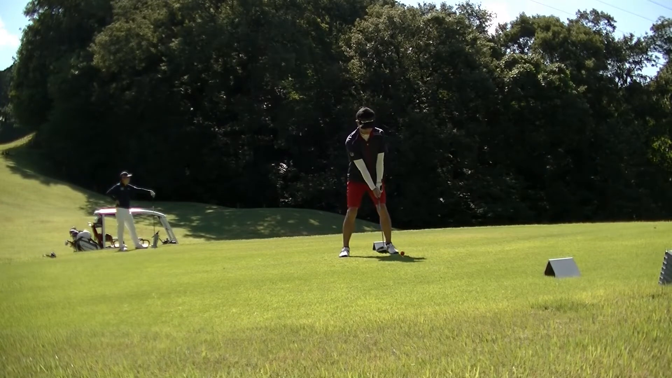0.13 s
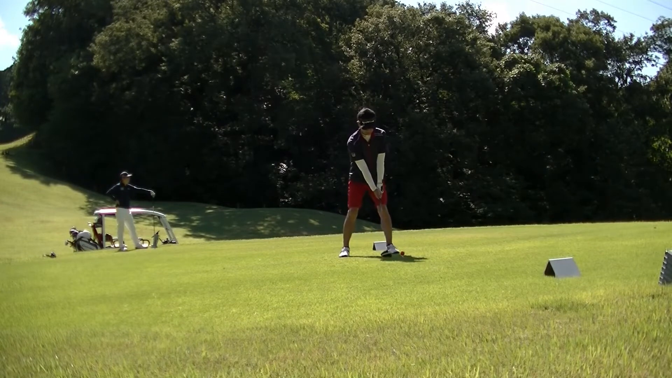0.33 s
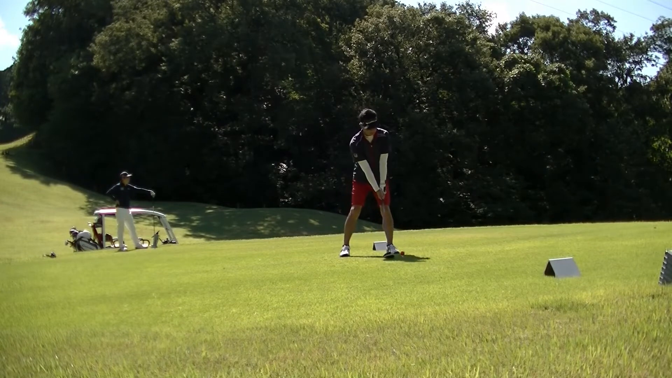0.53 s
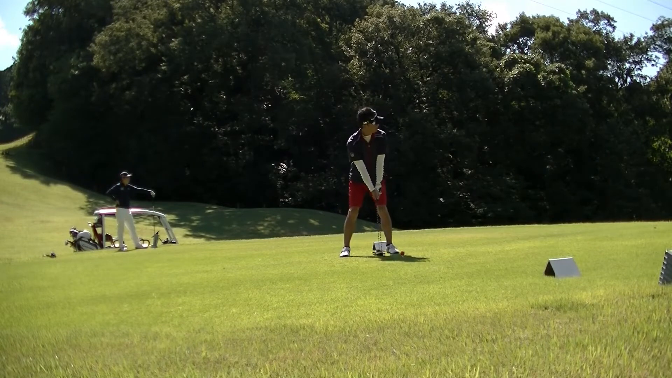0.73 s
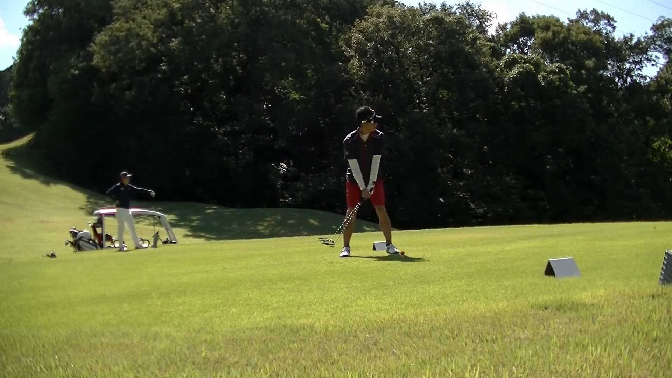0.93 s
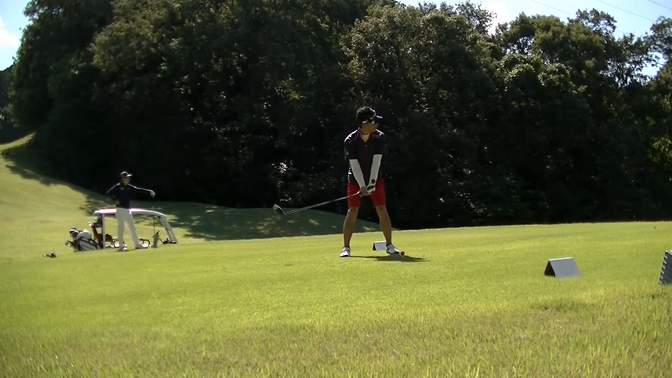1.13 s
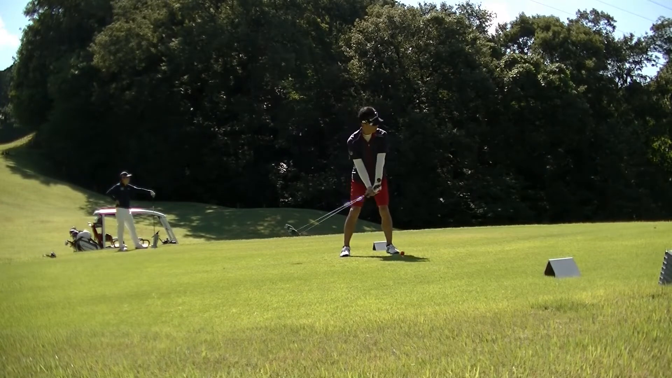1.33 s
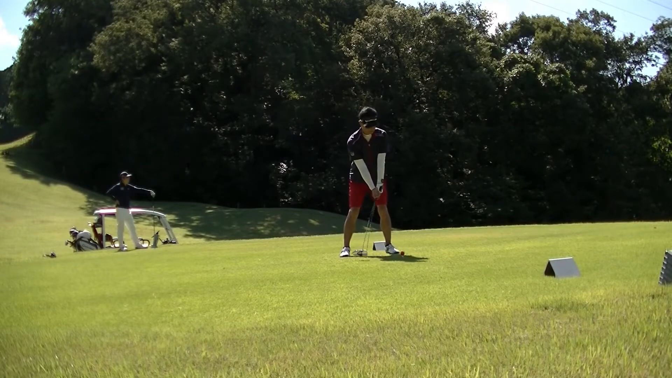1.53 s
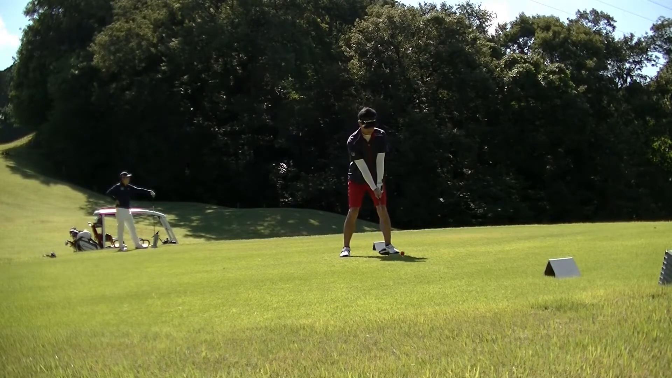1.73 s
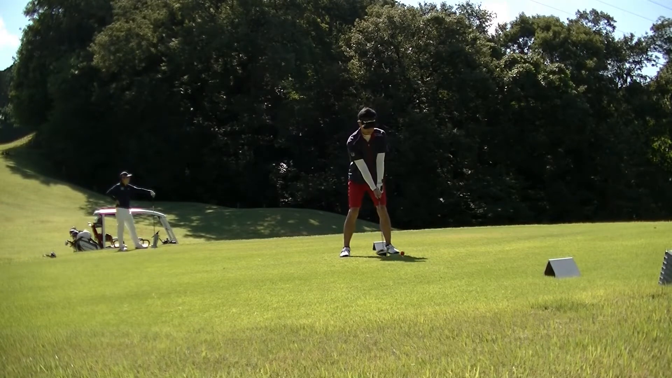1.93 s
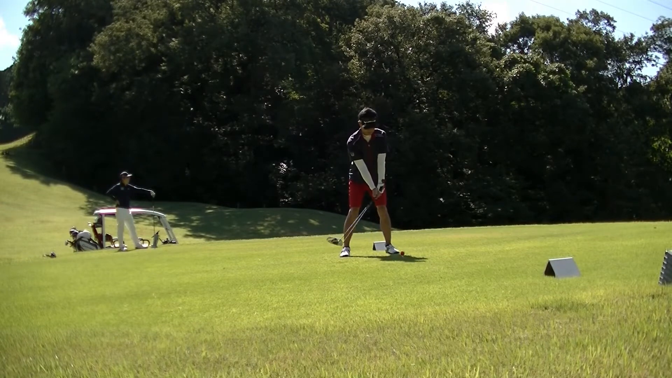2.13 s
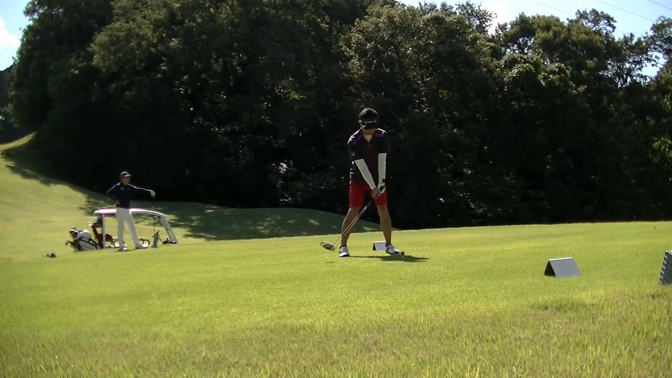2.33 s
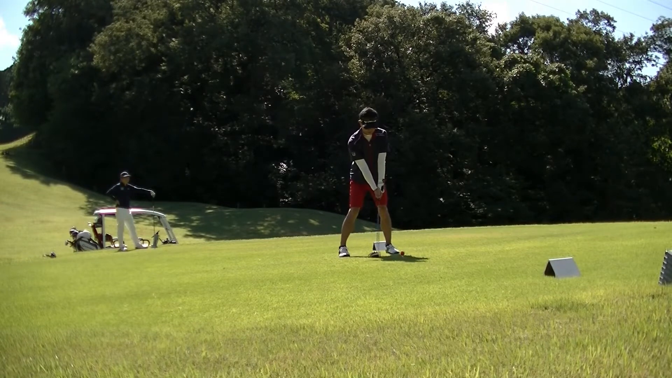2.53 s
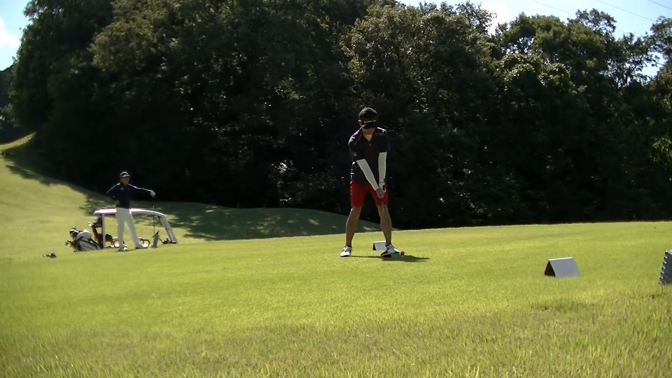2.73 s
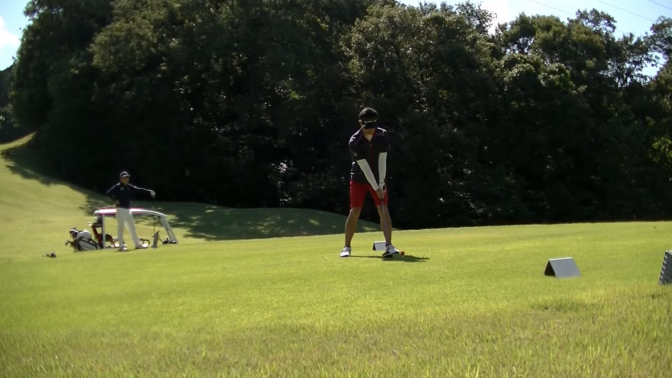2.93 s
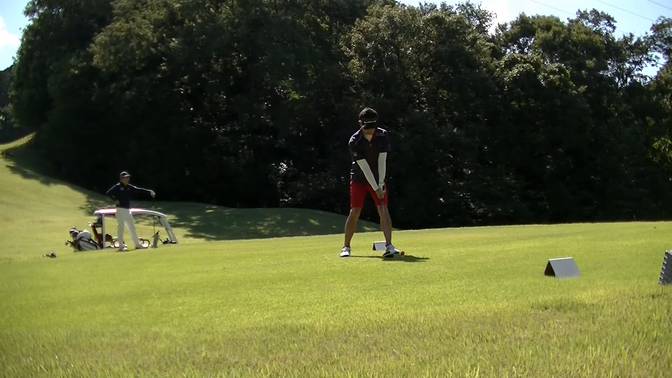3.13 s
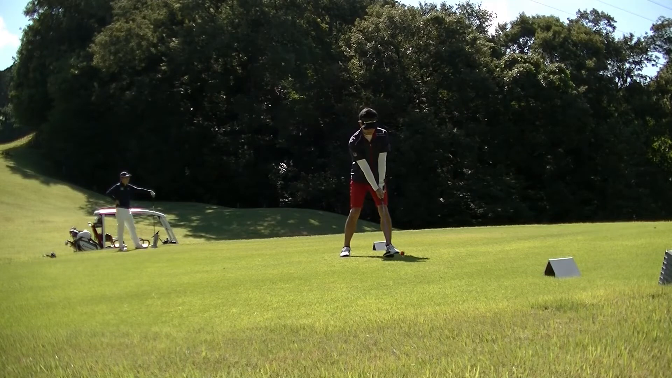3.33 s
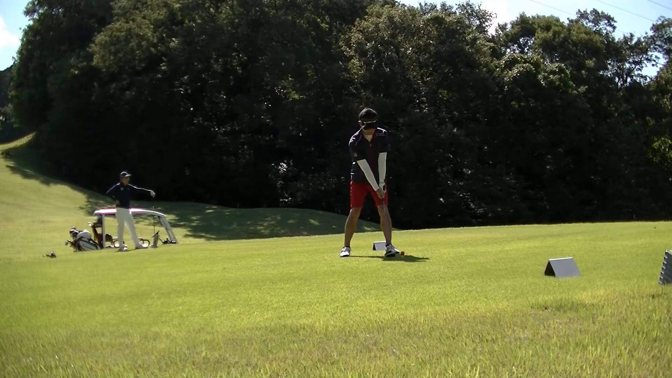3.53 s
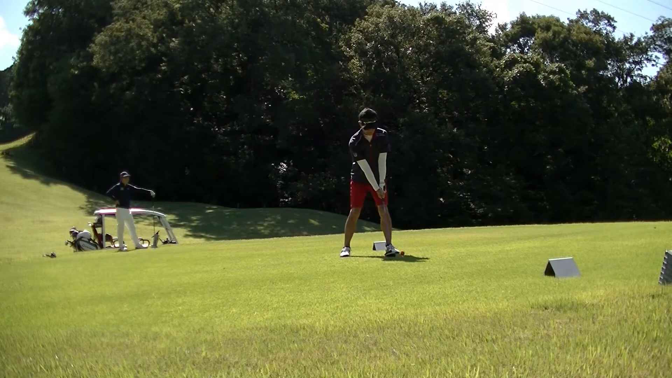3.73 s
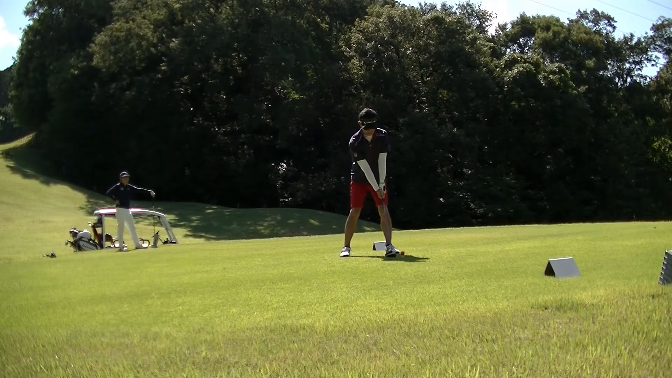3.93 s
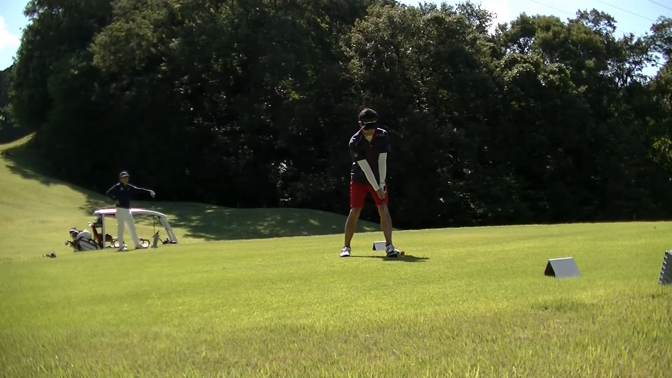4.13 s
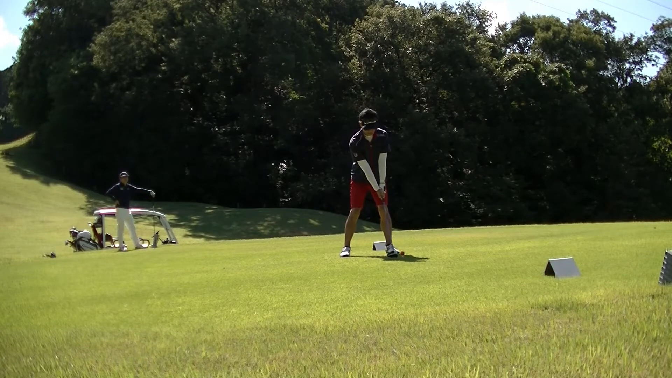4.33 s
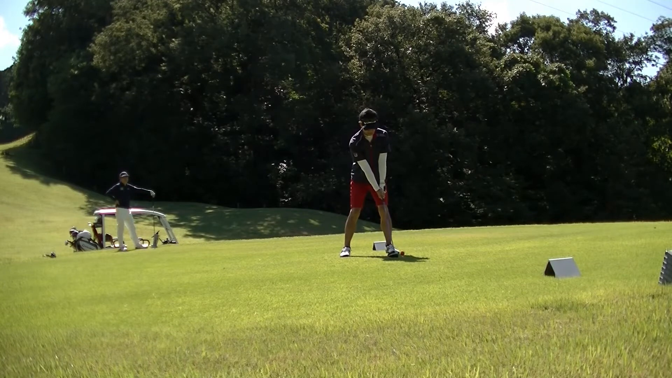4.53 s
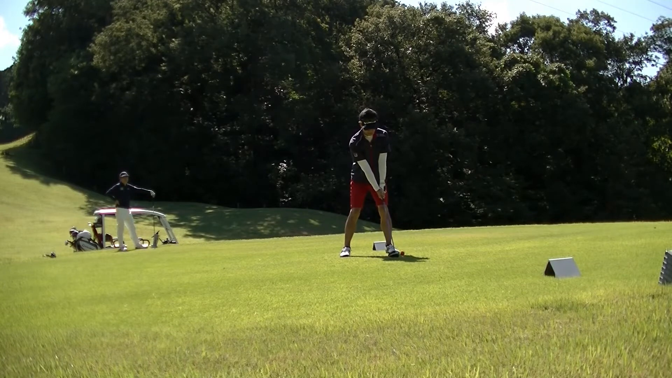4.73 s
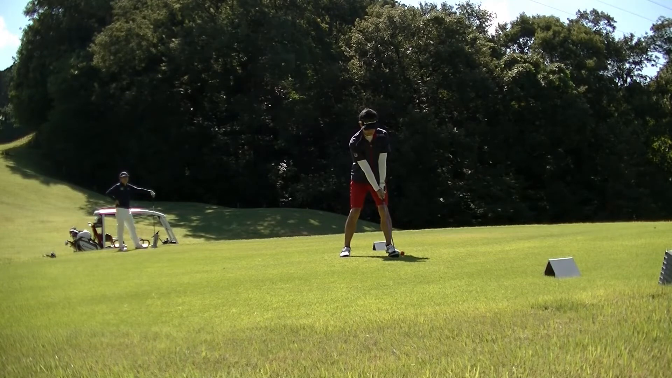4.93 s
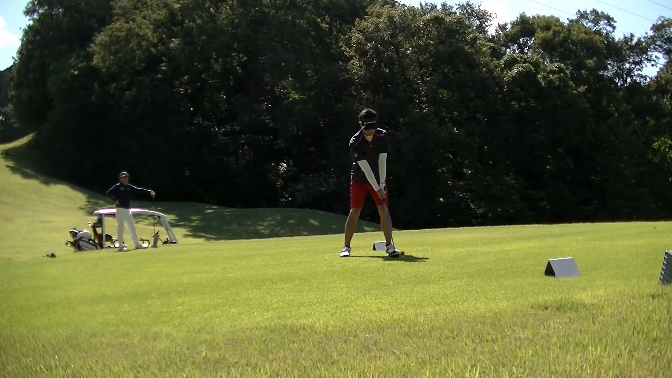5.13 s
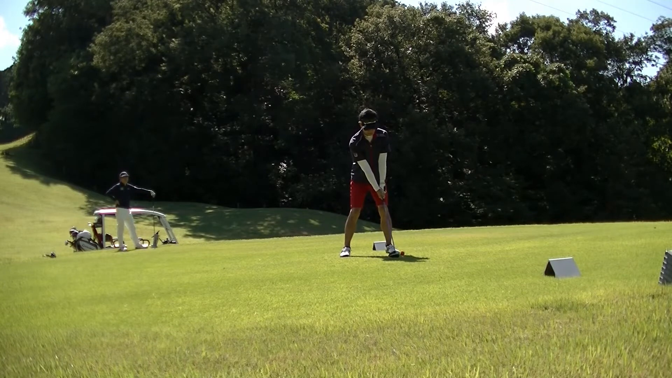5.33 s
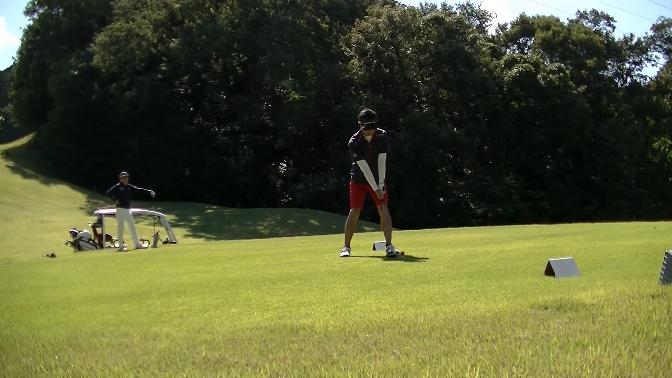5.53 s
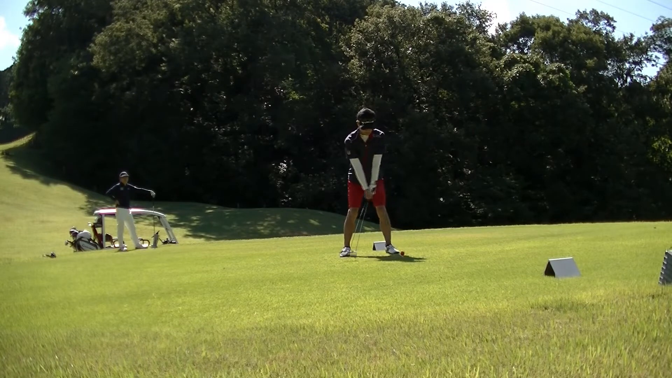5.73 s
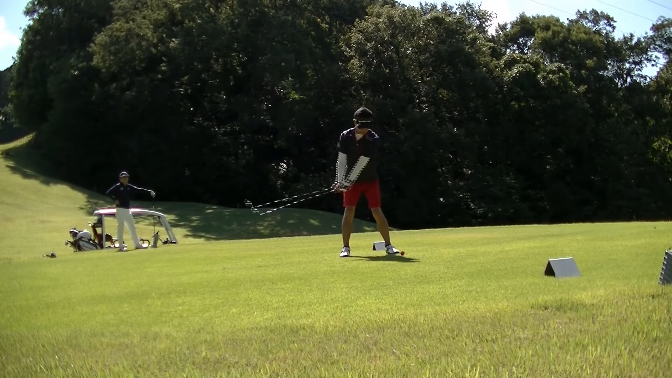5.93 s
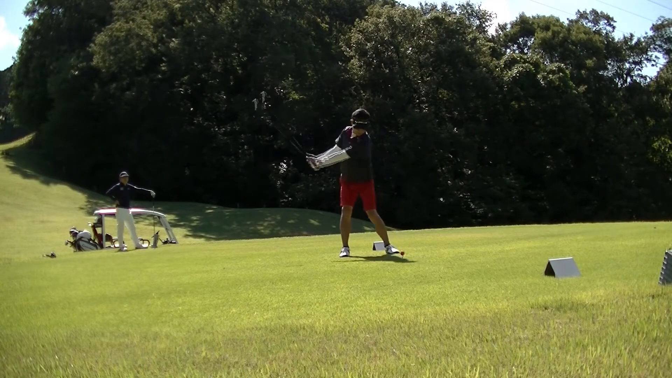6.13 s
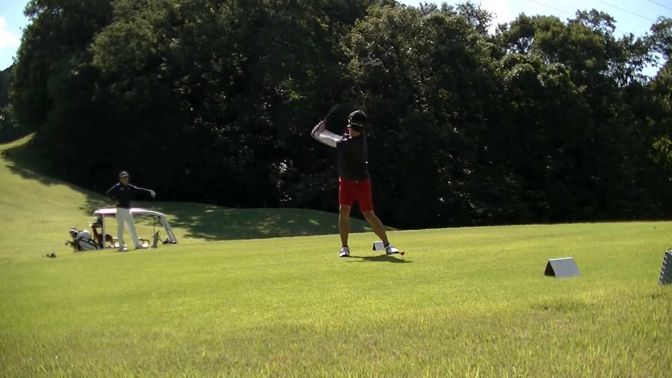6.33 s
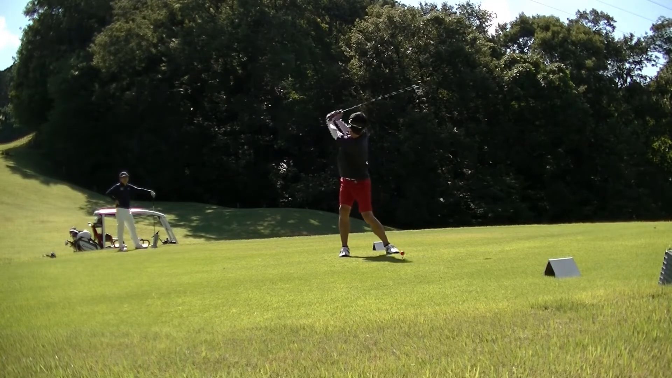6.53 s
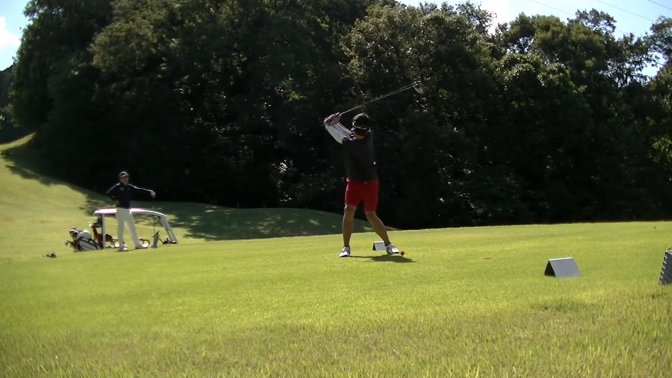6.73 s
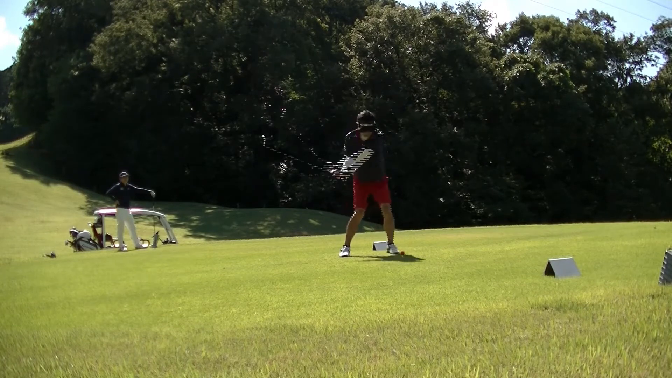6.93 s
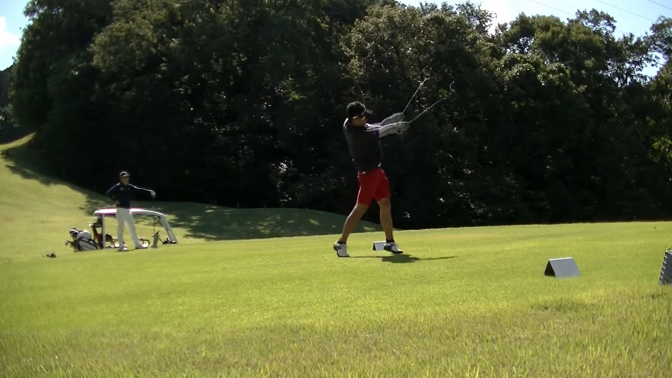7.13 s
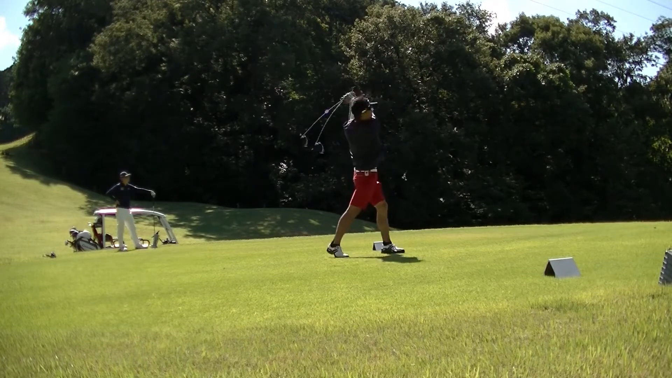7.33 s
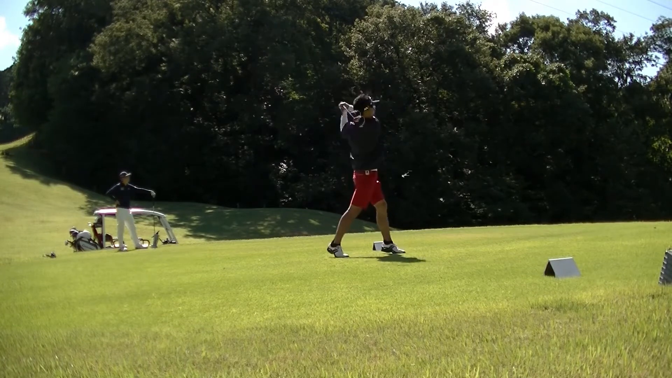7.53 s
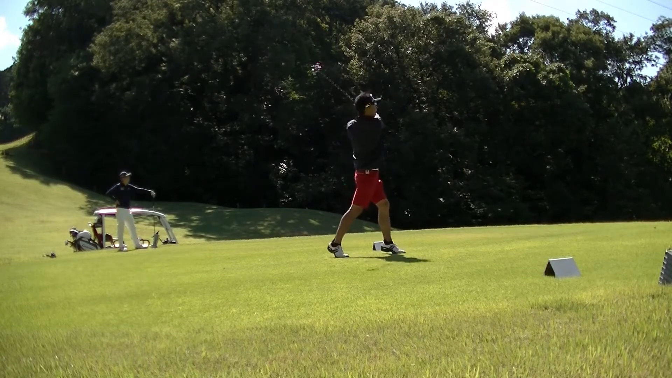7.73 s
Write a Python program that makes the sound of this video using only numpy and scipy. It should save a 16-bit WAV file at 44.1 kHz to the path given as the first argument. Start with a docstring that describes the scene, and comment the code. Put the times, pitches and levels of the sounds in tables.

```python
"""Golf drive at the edge of a wood

Air and a far insect chorus are coloured noise, cicadas noise-rung resonances; insects, birds and hoots are
noise bursts or gliding sines, plops decaying sines. Breeze on two microphone ports is low noise with single
eddy pulses. The shaft swishes as a speed-driven tone with hiss; the blow is a noise crack with decaying head
modes, followed by close copies, as off the ground, then thrown back by the trees as copies and a blurred wash."""
import sys
import numpy as np
from scipy import signal
from scipy.fft import rfft, irfft
from scipy.io import wavfile

SR = 44100
rng = np.random.default_rng(int(sys.argv[2]) if len(sys.argv) > 2 else 0)


def wrap_up_sound(samples):
    """Save the sound to the file named by the first command line argument, as 16-bit audio."""
    columns = np.atleast_2d(samples).T
    # keep every value between -1 and 1, then stretch to whole-number steps
    tamed = np.clip(columns, -1, 1)
    steps = np.round(tamed * 32767).astype(np.int16)
    wavfile.write(sys.argv[1], SR, steps)


N = 347592
TIME = np.arange(N) / SR
STRIKE_S = 7.0861


def from_db(db):
    """Amplitude gain of a level in dB."""
    return 10 ** (np.asarray(db, float) / 20)


def rms_one(x):
    """Scales to unit power over all channels."""
    return x / np.sqrt(np.mean(x ** 2) + 1e-20)


def in_time(rows):
    """Interpolates the columns of a (t/s, ...) table at every sample."""
    s, *columns = np.transpose(rows)
    return [np.interp(TIME, s, column) for column in columns]


def at_hz(points, hz):
    """Reads a (f/Hz, value) table on a log frequency axis."""
    table_hz, values = np.array(points).T
    return np.interp(np.log(np.maximum(hz, 1)), np.log(table_hz), values)


def colour(x, points):
    """Filters by a (f/Hz, level/dB) spectrum."""
    n = x.shape[-1]
    hz = np.arange(n // 2 + 1) * SR / n
    return irfft(rfft(x) * from_db(at_hz(points, hz)), n)


def stereo_noise():
    """White noise whose left-right correlation varies with frequency, by mid-side mixing."""
    # diffuse field at the two ports: f/Hz, correlation
    likeness = [(60, 0.87), (400, 0.34), (700, 0.37), (2400, 0.65), (4400, 0.89), (15000, 1)]
    mid, side = rfft(rng.standard_normal((2, N)))
    alike = np.clip(at_hz(likeness, np.arange(len(mid)) * SR / N), -1, 1)
    return irfft(np.sqrt(1 + alike) * mid + np.sqrt(1 - alike) * side * [[1], [-1]], N)


def drift(rate_hz):
    """Slow random curve of unit RMS: noise through two equal poles at rate_hz."""
    step = 40  # samples per slow point
    r = np.exp(-2 * np.pi * rate_hz * step / SR)
    noise = rng.standard_normal(N // step + 2002)
    slow = signal.lfilter([1], [1, -2 * r, r * r], noise)[2000:]  # settled part
    return np.interp(np.arange(N) / step, np.arange(len(slow)), rms_one(slow))


def resonate(x, hz, width_hz):
    """Two-pole resonance, about unit gain at its peak."""
    r = np.exp(-np.pi * width_hz / SR)
    zeros = np.array([1, 0, -1]) * (1 - r * r) / 2
    return signal.lfilter(zeros, [1, -2 * r * np.cos(2 * np.pi * hz / SR), r * r], x)


def resonate_twice(x, hz, width_hz):
    """Two equal resonances in series, for steeper skirts."""
    return resonate(resonate(x, hz, width_hz), hz, width_hz)


def band(x, low_hz, high_hz):
    """Butterworth band-pass."""
    return signal.sosfilt(signal.butter(2, [low_hz, high_hz], "band", fs=SR, output="sos"), x)


def glide(from_hz, to_hz, length_s):
    """Hann-shaped sine sliding linearly in pitch."""
    n = round(length_s * SR)
    phase = 2 * np.pi * np.cumsum(np.linspace(from_hz, to_hz, n)) / SR
    return np.hanning(n) * np.sin(phase)


def add(out, s, sound, pan_db=0, lag_s=0):
    """Adds a sound at s: left raised by pan_db / 2, right lowered by 0.875 pan_db and late by lag_s."""
    for side, shift_s, weight in ((0, 0, 1), (1, lag_s, -1.75)):
        i = max(round((s + shift_s) * SR), 0)
        out[side, i:i + len(sound)] += (sound * from_db(weight * pan_db / 2))[:N - i]


def air():
    """Far rustle and hiss: steady coloured noise."""
    # spectrum: f/Hz, relative density/dB per Hz
    spectrum = [(18, -43), (30, -19), (86, -5), (170, -2.5), (461, -2.5), (684, -3), (1100, -6), (1960, -9),
                (3770, -12), (4420, -4), (5900, -3.5), (6720, -13.5), (7270, -13), (14400, -25.5),
                (16000, -25)]
    return from_db(-57.5) * rms_one(colour(stereo_noise(), spectrum))


def far_chorus():
    """Far insect chorus: a soft band of noise that swells and fades."""
    # chorus: t/s, level/dB before the wander
    murmur = [(0.0, -66), (2.2, -64.5), (3.6, -70), (5.8, -70), (6.9, -65), (7.88, -75)]
    level_db = in_time(murmur)[0] + 2.0 * drift(4.4)
    return from_db(level_db) * rms_one(band(stereo_noise(), 1300, 3400))


def cicadas():
    """Clicks too dense to tell apart ring each body; every group throbs and swells on its own."""
    # body resonances: f/Hz, width/Hz, relative level/dB
    bodies = [(4270, 400, -1), (4550, 348, -1), (4866, 240, -2.5), (5187, 150, -3.5), (5455, 140, -2.5),
              (5797, 240, -2.5), (6026, 204, -3), (6290, 78, -5.5), (7230, 770, -10.5), (8320, 690, -14)]
    # whole chorus: t/s, level/dB
    chorus = [(0.0, -56.5), (0.6, -58), (1.5, -56.5), (5.3, -57.5), (7.88, -57)]
    # nearer cicadas swelling out of the chorus: start/s, length/s, f/Hz, level/dB
    solos = [(1.0, 0.32, 4660, -60.5), (3.2, 0.75, 5410, -62.5), (4.6, 0.5, 4950, -64),
             (5.398, 0.63, 5570, -66)]
    out = 0
    for hz, width_hz, db in bodies:
        throb = 1 + .33 * np.sin(2 * np.pi * 141 * TIME + 1.5 * drift(2))
        rings = resonate_twice(stereo_noise() * throb, hz, width_hz)
        out = out + from_db(db + 1.5 * drift(2) + 1.2 * drift(12)) * rms_one(rings)
    out = from_db(in_time(chorus)[0]) * rms_one(out) * from_db([[-.4], [.4]])
    for s, length_s, hz, db in solos:
        noise = rng.standard_normal(round(length_s * SR))
        add(out, s, from_db(db) * np.hanning(len(noise)) * rms_one(resonate_twice(noise, hz, 150)))
    return out


def insect_chirps():
    """Far insects: rough chirps of noise through a narrow resonance."""
    # chirps: start/s, level/dB, f/Hz
    chirps = [(0.176, -62, 2910), (0.409, -62, 2880), (0.665, -62, 2940), (0.92, -59, 2900),
              (1.182, -61, 2880), (1.479, -65, 2960), (1.776, -61, 2900), (2.023, -61, 2790),
              (2.279, -63, 2790), (2.51, -64, 2930), (2.771, -66, 2760), (3.071, -63, 2780)]
    out = np.zeros((2, N))
    shape = np.sqrt(np.hanning(round(.08 * SR)))
    for s, db, hz in chirps:
        noise = rng.standard_normal(len(shape))
        add(out, s, from_db(db) * shape * rms_one(resonate_twice(noise, hz, 260)))
    return out


def cricket():
    """Trills of short falling notes, uneven in level and timing."""
    # trills: first note/s, end/s, rate/notes per s, mid f/Hz, mean level/dB
    trills = [(-.003, .235, 36.5, 4720, -50), (7.505, 7.87, 41.5, 4960, -53)]
    out = np.zeros((2, N))
    for first_s, last_s, rate, hz, db in trills:
        starts = np.arange(first_s, last_s, 1 / rate)
        for s, (size, late) in zip(starts, rng.standard_normal((30, 2))):
            note = glide(1.03 * hz, .965 * hz, .022)
            add(out, s + .001 * late, from_db(db + 2.5 * size) * note)
    return out


def birds():
    """Two far birds: croaks of falling harmonics and rising whistles, blurred by leaves on the way."""
    # croaks: start/s, mid pitch/Hz, level/dB
    croak_notes = [(1.299, 537, -61), (1.538, 537, -61), (1.788, 526, -57.5), (2.049, 528, -60),
                   (2.3, 518, -62)]
    # croak harmonics: multiple of the pitch, relative level/dB
    partials = [(3, 1.5), (4, -3), (5, -2.5), (6, 0)]
    # whistles: start/s, from f/Hz, to f/Hz, level/dB
    whistle_notes = [(.46, 2080, 2410, -65), (1.34, 2100, 2370, -66), (2.17, 2100, 2480, -64),
                     (2.96, 2100, 2450, -60.5), (3.73, 2050, 2400, -64)]
    croaks, whistles = np.zeros((2, 2, N))
    for s, hz, db in croak_notes:
        for k, partial_db in partials:
            partial_hz = round(k) * hz
            add(croaks, s, from_db(db + partial_db) * glide(1.015 * partial_hz, .985 * partial_hz, .078))
    for s, from_hz, to_hz, db in whistle_notes:
        add(whistles, s, from_db(db) * glide(from_hz, to_hz, .11))
    hoarse = rms_one(band(rng.standard_normal(N), 20, 180))
    return croaks * (.45 + .65 * hoarse) + whistles * (.75 + .45 * drift(60))


def hoots():
    """Two soft low hoots after the blow: rising sines."""
    # hoots: start/s, length/s, from f/Hz, to f/Hz, level/dB
    notes = [(7.7, .11, 560, 660, -56), (7.8, .065, 560, 680, -59)]
    out = np.zeros((2, N))
    for s, length_s, from_hz, to_hz, db in notes:
        add(out, s, from_db(db) * glide(from_hz, to_hz, length_s))
    return out


def plop(hz, db, t60_s):
    """A bubble rings a few cycles, rising a little in pitch."""
    t, decay_s = TIME[:round(.1 * SR)], t60_s / np.log(1000)
    envelope = (1 - np.exp(-t / .001)) * np.exp(-t / decay_s)
    return from_db(db) * envelope * np.sin(2 * np.pi * hz * t * (.96 + .025 * t / decay_s))


def water():
    """Bubbles: clear plops over a random patter of faint ones, and small dry ticks of noise."""
    # clear plops: start/s, level/dB, nominal f/Hz
    plops = [(0.621, -49, 610), (0.85, -48, 594), (0.996, -44, 607), (1.058, -50, 617), (1.203, -50, 795),
             (1.68, -49, 724), (1.772, -50, 730), (1.793, -50, 625), (2.162, -47.5, 612), (2.27, -51, 574),
             (2.419, -49.5, 514), (2.467, -43, 620), (2.959, -49, 763), (3.352, -48.5, 570),
             (3.419, -49, 711), (3.744, -40.5, 690), (4.109, -47, 620), (4.151, -50, 636),
             (4.556, -46, 704), (4.713, -46, 690), (5.143, -48, 760), (5.357, -47, 620), (5.702, -51, 660),
             (5.919, -51, 540), (6.07, -48, 722), (6.225, -44.5, 644), (6.298, -47.5, 814),
             (6.501, -50, 694), (6.584, -48.5, 698), (6.802, -49, 560)]
    # ticks: start/s, level/dB
    ticks = [(0.051, -49), (0.7677, -41.5), (6.257, -46.5), (7.5738, -44.5)]
    plop_cycles, patter_cycles = 37, 50  # cycles to fall 60 dB
    patter_floor_db, patter_spread_db = -63, 3.5
    out = np.zeros((2, N))
    for s, db, hz in plops:
        add(out, s, plop(hz, db, plop_cycles / hz), 1.2)
    for when, pitch, size, where in rng.random((270, 4)):
        s = .3 + when * (N / SR - .3)
        hz = 500 + 380 * pitch
        db = patter_floor_db - patter_spread_db * np.log(1 - .95 * size)  # few loud, many faint
        add(out, s, plop(hz, db, patter_cycles / hz), 4.5 * where - 1.5)
    for s, db in ticks:
        t = TIME[:round(.02 * SR)]
        noise = rms_one(band(rng.standard_normal(len(t)), 1500, 4500))
        add(out, s, from_db(db) * np.exp(-t / .004) * noise)
    return out


def wind():
    """Lumpy rumble on each port, swelling in gusts; single eddies pass one port after the other."""
    # level between the gusts: t/s, level/dB
    breeze = [(0.0, -63), (0.55, -72), (1.3, -60), (2.1, -58), (4.0, -60), (5.2, -64), (5.9, -69),
              (6.3, -74), (7.88, -78)]
    # gusts added to the breeze: start/s, length/s, level/dB
    gusts = [(0.26, 0.18, -56), (0.64, 0.07, -56), (0.78, 0.25, -60), (1.2, 0.12, -46), (1.32, 0.05, -44),
             (1.39, 0.07, -47), (1.74, 0.22, -59), (1.99, 0.18, -47), (2.18, 0.07, -46), (2.3, 0.14, -54),
             (2.5, 0.14, -58), (2.76, 0.1, -55), (2.93, 0.2, -50), (3.28, 0.11, -44), (3.44, 0.24, -54),
             (3.79, 0.18, -53), (4.06, 0.2, -51), (4.41, 0.22, -54), (4.92, 0.14, -55), (5.19, 0.13, -57),
             (5.72, 0.1, -60)]
    # eddies: start/s, level/dB, f/Hz, pan/dB as in add()
    eddies = [(1.105, -43, 177, -4), (1.218, -32.5, 143, -4), (1.331, -22.5, 186, -2.5),
              (1.408, -36, 135, -2.5), (1.505, -39.5, 96, -4.5), (1.751, -41.5, 127, 9),
              (1.866, -42, 103, 10), (2.03, -42, 194, 2), (2.08, -33, 170, 4), (2.199, -43, 117, -19.5),
              (2.319, -34.5, 99, -2), (2.765, -43.5, 113, 11), (2.81, -42, 108, -8.5),
              (2.979, -36.5, 117, -8.5), (3.03, -35.5, 137, -4), (3.098, -45, 176, 16.5),
              (3.305, -38, 149, 16), (3.457, -44.5, 158, 16), (3.524, -42, 134, -7), (3.615, -34, 102, 1),
              (3.808, -37.5, 102, 6), (3.861, -37, 134, 11.5), (4.117, -39.5, 110, 16),
              (4.435, -39, 106, 1), (4.503, -41.5, 139, 12.5), (4.585, -40, 90, 4), (4.927, -45, 127, 17),
              (5.26, -47.5, 118, 21)]
    gust_edge = .8  # share of a gust spent rising and falling
    port_lag_s = .0055  # an eddy reaches the right port later
    lumps = np.array([from_db(3.3 * drift(13)) for side in range(2)])
    left, right = lumps * rng.standard_normal((2, N))
    # a gust pushes one port as it sucks the other
    rumble = band([left - .067 * right, right - .067 * left], 50, 166)
    strength = from_db(in_time(breeze)[0]) * np.ones((2, 1))
    for s, length_s, db in gusts:
        add(strength, s, from_db(db) * signal.windows.tukey(round(length_s * SR), gust_edge))
    out = strength * rms_one(band(rumble, 35, 450))
    for s, db, hz, pan_db in eddies:
        turns = hz * TIME[:round(.05 * SR)] - 1.5
        pulse = np.exp(-(turns / .64) ** 2) * np.cos(2 * np.pi * turns)
        add(out, s, from_db(db) * pulse, pan_db, port_lag_s)
    return band(out, 55, 1400)


def returning(delay_s, build_s, db, t60_s):
    """Power coming back from one distance: it builds, then dies away."""
    t = np.maximum(TIME - STRIKE_S - delay_s, 0)
    decay = from_db(db - 60 * np.maximum(t - build_s, 0) / t60_s)
    return (np.minimum(t / build_s, 1) ** 1.5 * decay) ** 2


def wood():
    """Countless small reflectors blur the blow into a noise wash, its three bands decaying apart."""
    # wash spectrum: f/Hz, relative density/dB per Hz
    wood_colour = [(180, -18.5), (300, -15), (450, -13), (650, -4.5), (960, -3), (1650, -7), (2320, -11),
                   (3100, -6.5), (4470, -3.5), (5900, -6.5), (9030, -12), (15000, -39)]
    # stands of trees: delay/s, build/s, low level/dB, middle level/dB, treble level/dB
    stands = [(.025, .03, -54, -47, -46), (.055, .03, -34, -35, -32), (.085, .03, -34, -41, -39),
              (.12, .025, -35, -39, -48), (.17, .035, -38, -44, -48), (.23, .035, -48, -53, -42),
              (.285, .035, -45.5, -51, -52), (.34, .035, -47, -58, -57)]
    # stand decay t60/s: low, middle, treble
    stand_t60_s = (.28, .28, .25)
    # long tail from deep in the wood: low, middle, treble
    depths_db, depths_t60_s = (-46, -49, -54), (2.2, 2.2, 1.6)
    edges_hz = (200, 1900, 5500, 14000)
    mid, side = rng.standard_normal((2, N))
    white = mid + from_db(-14.5) * side * [[1], [-1]]
    ring = rms_one(resonate_twice(white, 3620, 500))  # the longest modes of the head live on
    wash = rms_one(colour(white, wood_colour)) + from_db(-11.5) * ring
    wash = wash * from_db(1.2 * drift(72))
    out = 0
    for k in range(3):
        power = returning(.1, .08, depths_db[k], depths_t60_s[k])
        for row in stands:
            power += returning(row[0], row[1], row[2 + k], stand_t60_s[k])
        sign = (-1) ** k  # alternates so the bands join
        out = out + sign * np.sqrt(power) * band(wash, edges_hz[k], edges_hz[k + 1])
    return out


def swish():
    """Vortices leave the shaft at a rate set by its speed; the head hisses; both grow steeply with speed."""
    # swing through the blow and follow-through: t/s, shaft speed as shedding rate f/Hz
    swing = [(6.92, 300), (7.0, 510), (7.03, 670), (7.06, 835), (7.08, 881), (7.1, 680), (7.15, 590),
             (7.22, 250)]
    full_speed_hz = 880
    tone_db, tone_db_per_octave = -33.5, 29  # at full speed; loss per halving of speed
    hiss_db, hiss_db_per_octave = -42, 22
    hz, = in_time(swing)
    octaves = np.log2(hz / full_speed_hz)
    phase = 2 * np.pi * np.cumsum(hz) / SR
    tone = (1.05 + .6 * drift(60)) * np.sin(phase) + .6 * drift(60) * np.cos(phase)
    # slower parts of the shaft, near the hands
    wake = .54 * rms_one(band(rng.standard_normal(N), 170, 670))
    low_hiss = band(rng.standard_normal(N), 920, 5400)
    high_hiss = band(rng.standard_normal(N), 5010, 10000)
    hiss = rms_one(low_hiss + .49 * high_hiss)
    moving = (TIME > swing[0][0]) & (TIME < swing[-1][0])
    shaft = from_db(tone_db + tone_db_per_octave * octaves) * (tone + wake)
    return moving * (shaft + from_db(hiss_db + hiss_db_per_octave * octaves) * hiss)


def head_ring():
    """Modes of the hollow head sink in pitch as it swings away, with a random wobble in level."""
    # head modes: final f/Hz, level/dB, t60/s
    modes = [(1830, -5.5, 0.0028), (3467, -27, 0.22), (3504, -31.5, 0.16), (5340, -21, 0.075),
             (6800, -19, .03), (8260, -16, 0.026), (8900, -20, 0.061), (10300, -19, 0.031)]
    sharp, away_s = .06, .025  # share sharp at contact; time to swing away
    ring_roughness = .3  # depth of a random level wobble on each mode
    t, out = TIME[:round(.2 * SR)], 0
    heard_s = t + sharp * away_s * (1 - np.exp(-t / away_s))
    for (hz, db, t60_s), phase in zip(modes, rng.random(len(modes))):
        wobble = 1 + ring_roughness * drift(50)[:len(t)]
        out = out + wobble * from_db(db - 60 * t / t60_s) * np.sin(2 * np.pi * (hz * heard_s + phase))
    return out * (1 - np.exp(-t / .0003))


def crack():
    """Noise burst of face-ball contact, with a short rattle of tee and turf."""
    # crack spectrum: f/Hz, relative density/dB per Hz
    spectrum = [(120, -46), (200, -8), (1700, 1.5), (2800, 1), (3310, -24), (4220, 1), (6470, 0.5),
                (9210, 7), (9920, -4), (11100, -9.5), (11700, -2), (13900, -5.5), (17000, -32)]
    contact_s = .0014
    t = TIME[:round(.06 * SR)]
    envelope = (t < contact_s) + .27 * np.exp(-t / .008)
    sound = band(envelope * colour(rng.standard_normal(len(t)), spectrum), 200, 18000)
    return from_db(-8) * sound / np.std(sound[t < contact_s])


def strike():
    """The blow: head ring and crack, close copies as off the ground, treble copies from the trunks."""
    # near echoes: delay/s, gain/dB
    near_echoes = [(.0045, -23), (.0066, -8), (.012, -16), (0.014, -16)]
    # single trunks: delay/s, gain/dB
    trunks = [(.0495, -28), (.0575, -26)]
    out = np.zeros((2, N))
    snap = crack()
    add(out, STRIKE_S, head_ring())
    add(out, STRIKE_S, snap)
    for delay_s, db in near_echoes:
        add(out, STRIKE_S + delay_s, from_db(db) * snap)
    for delay_s, db in trunks:
        add(out, STRIKE_S + delay_s, from_db(db) * band(snap, 3500, 10000))
    return out


def scene():
    """Sum of all sources at the microphone."""
    background = air() + far_chorus() + cicadas() + insect_chirps() + cricket() + birds() + hoots()
    return background + water() + wind() + wood() + swish() + strike()


def record(dry):
    """Rounds the sharpest peaks and cuts the top."""
    rounded = dry / (1 + np.abs(dry / .78) ** 4) ** .25
    cutoff_hz = 16600
    return signal.sosfilt(signal.cheby2(12, 70, cutoff_hz, fs=SR, output="sos"), rounded)


dry = scene()
out = record(dry)
wrap_up_sound(out)
```